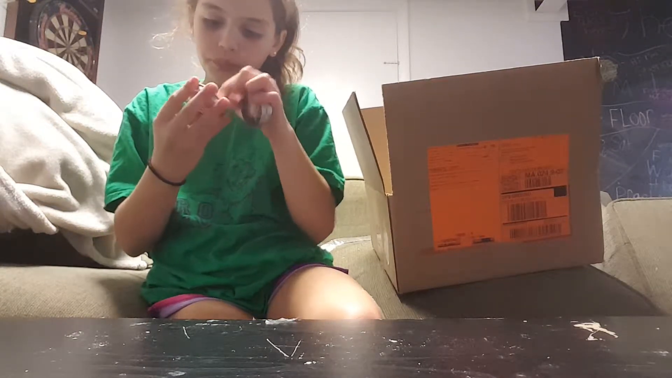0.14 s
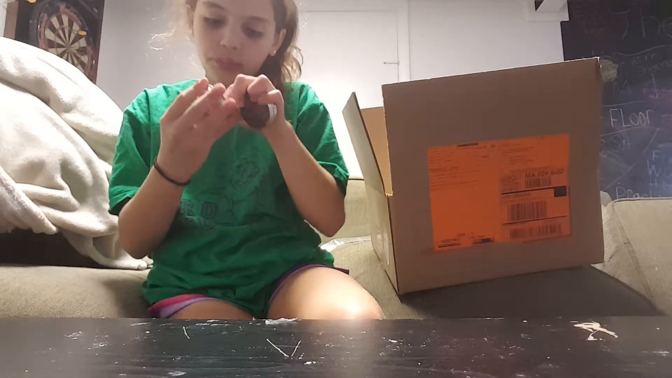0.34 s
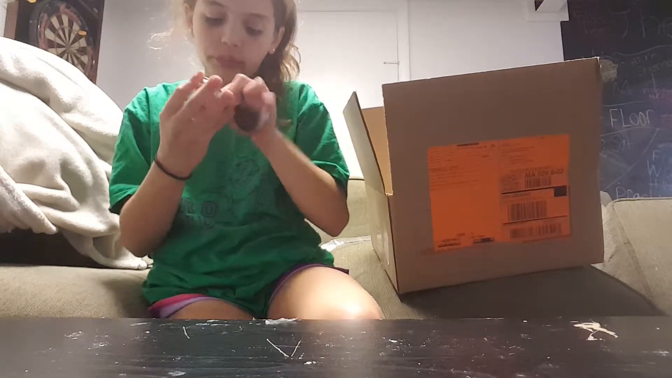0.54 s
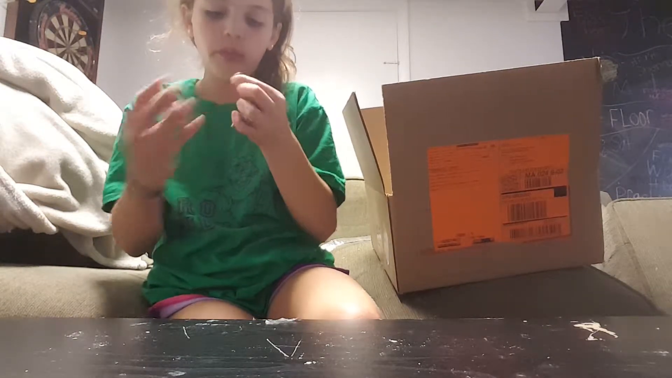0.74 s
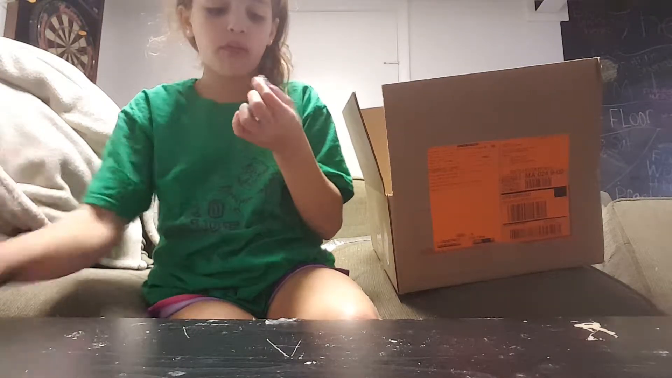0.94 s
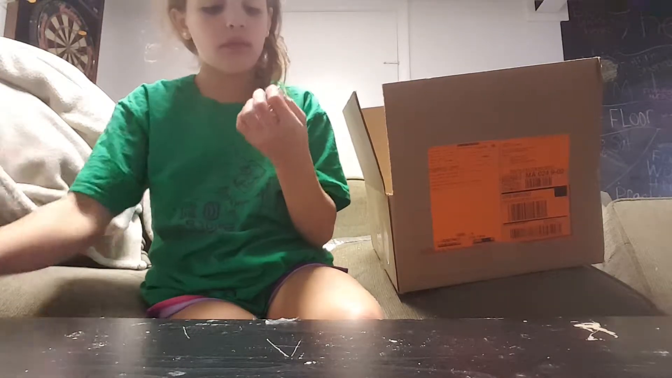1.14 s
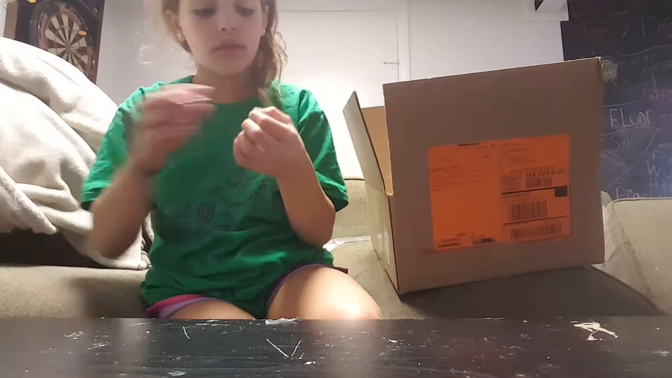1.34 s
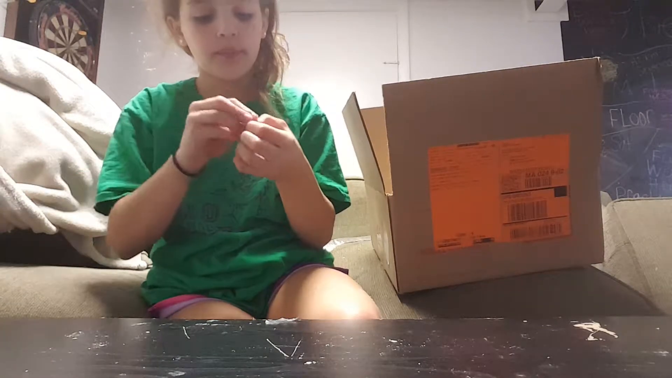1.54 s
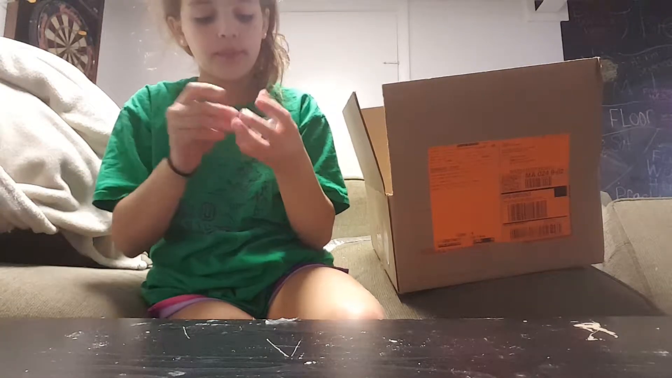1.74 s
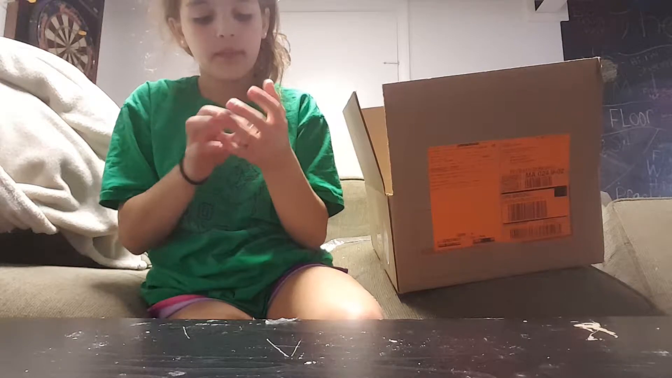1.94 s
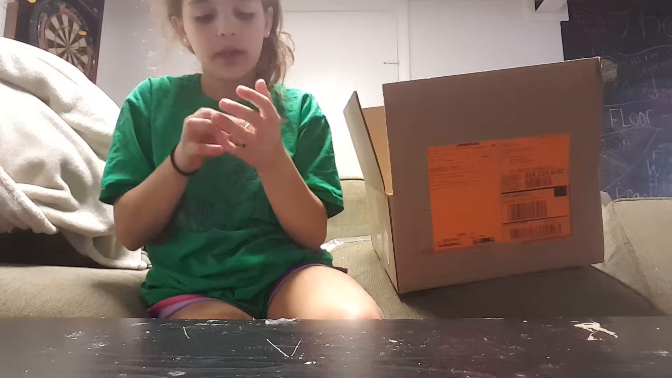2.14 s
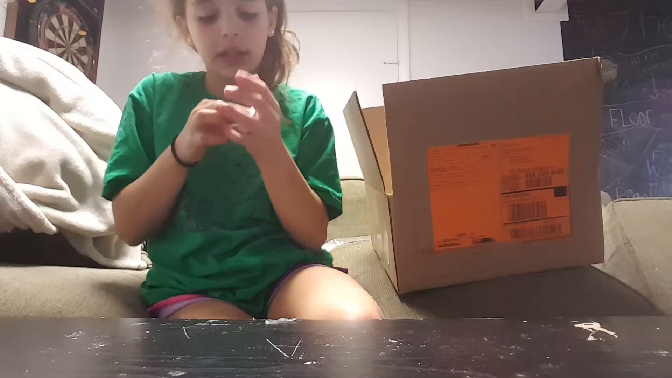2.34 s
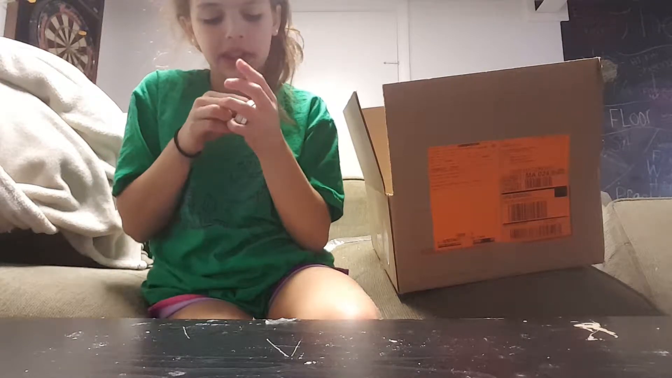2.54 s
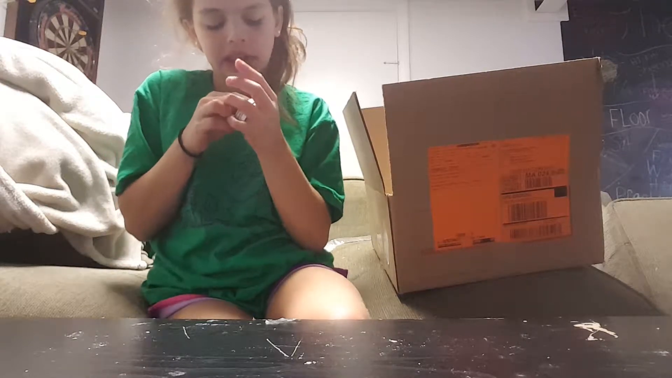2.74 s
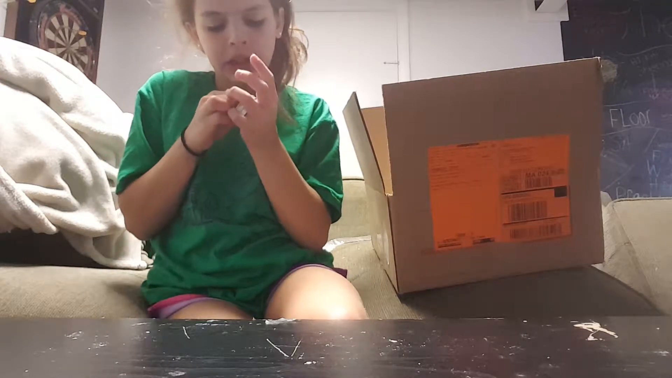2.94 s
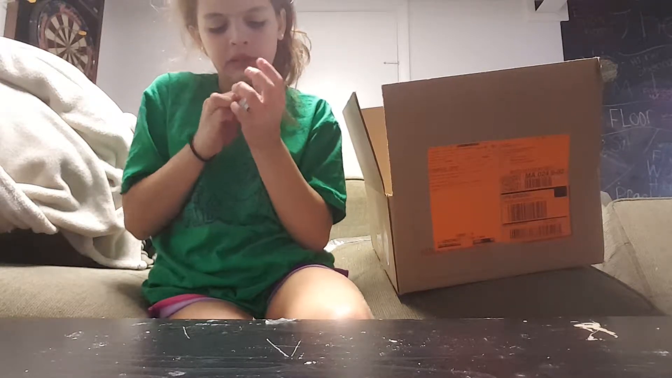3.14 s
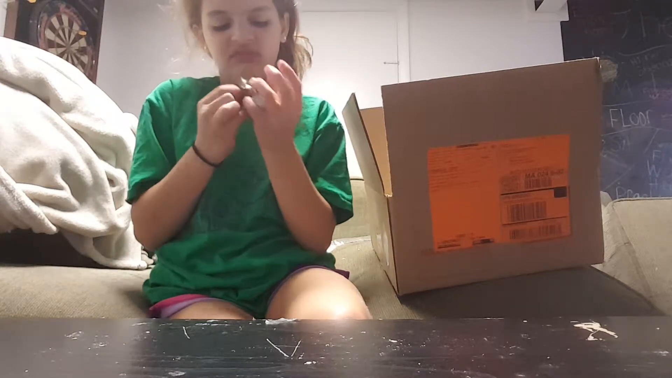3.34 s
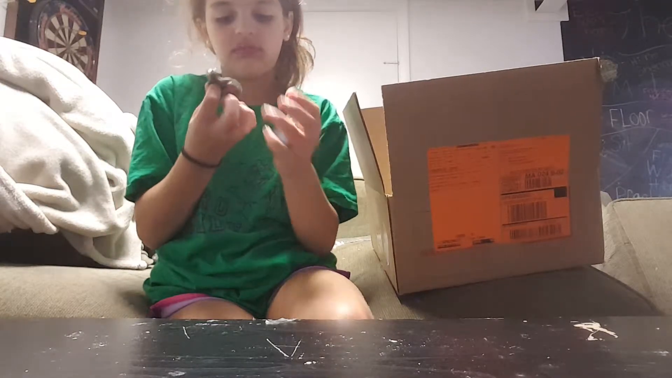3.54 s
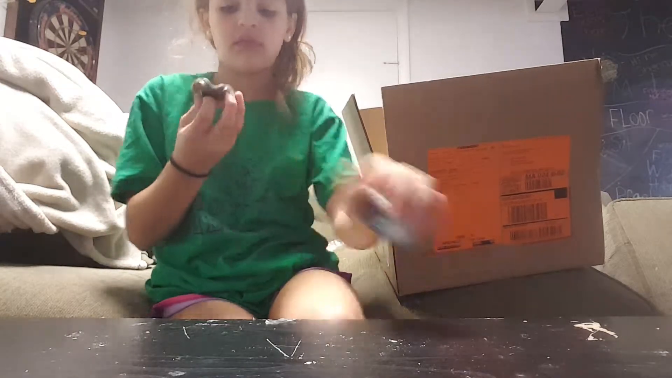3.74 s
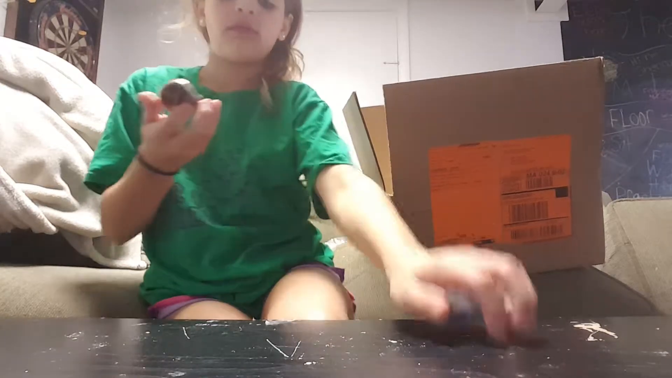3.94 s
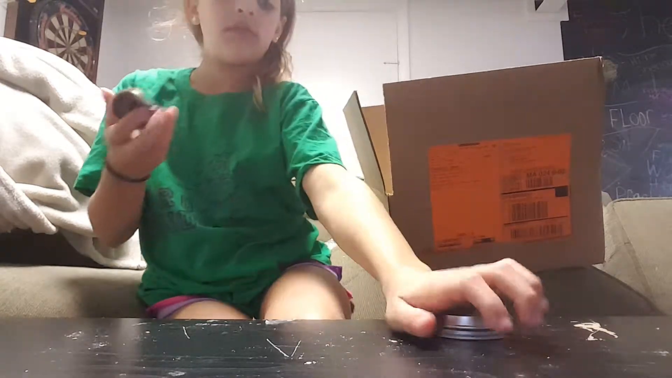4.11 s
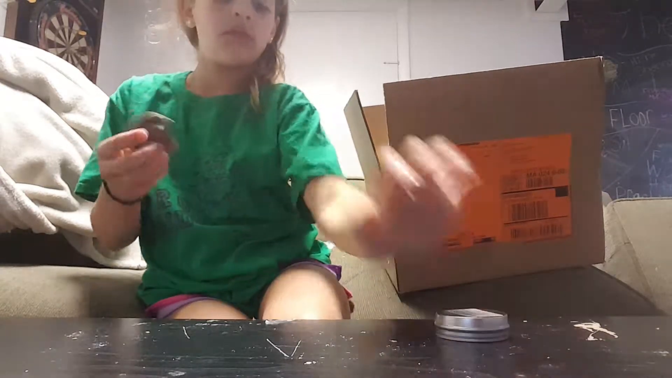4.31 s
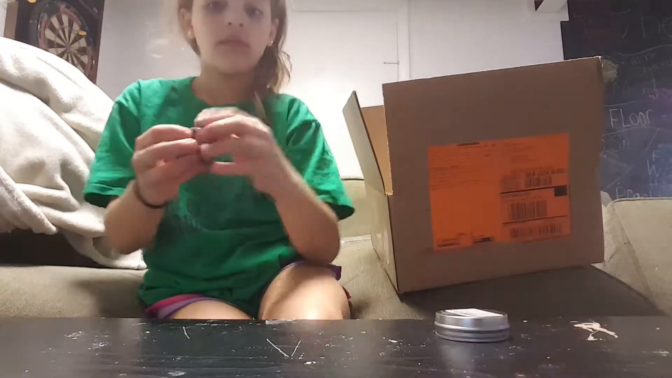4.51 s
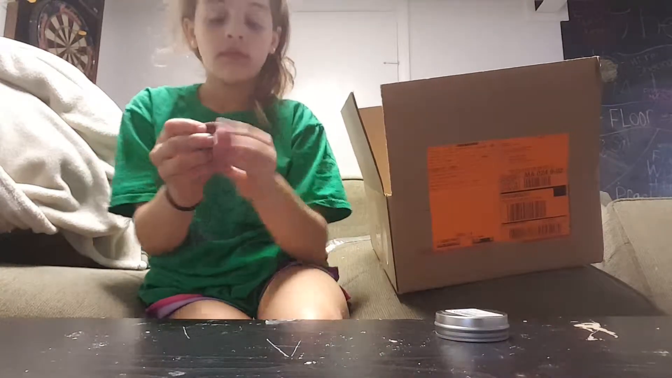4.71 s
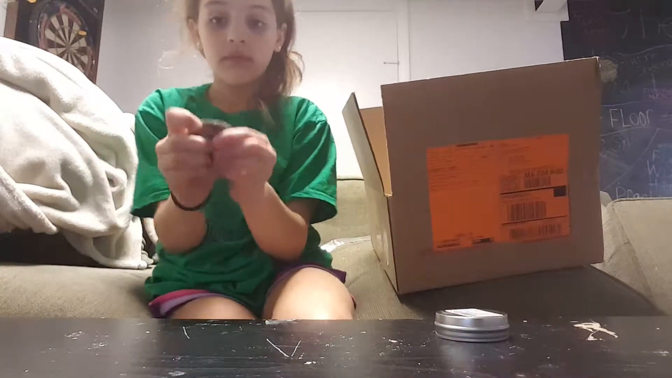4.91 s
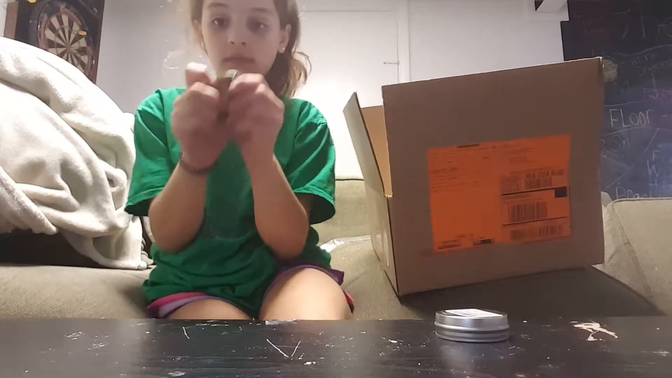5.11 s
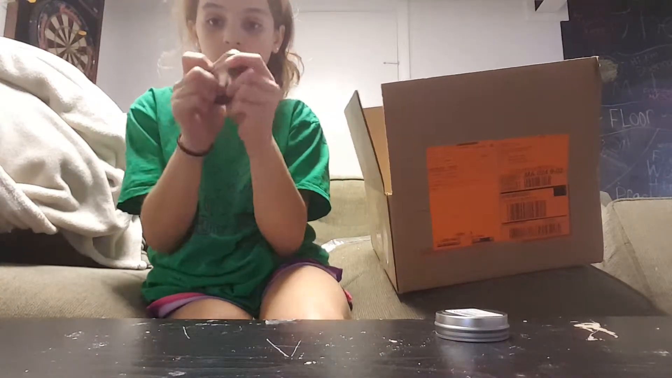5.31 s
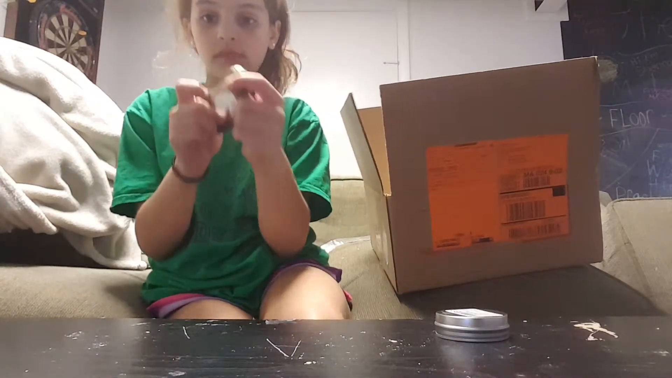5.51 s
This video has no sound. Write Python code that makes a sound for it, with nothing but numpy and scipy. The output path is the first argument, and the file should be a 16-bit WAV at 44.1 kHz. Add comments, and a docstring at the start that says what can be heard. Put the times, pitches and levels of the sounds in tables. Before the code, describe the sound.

Soft sticky handling of putty is interrupted by a loud, close clatter as a small metal lid lands and rolls on a wooden table. Sparse sharp little pops and faint squishes follow from the hands. The tin then knocks onto the table, falls flat and settles with quick fading ticks. A dull bump comes near the end, and the quiet room holds a low rumble and slight electrical hum.

```python
"""A small metal tin of putty, handled over a wooden table in a quiet room.
Its lid drops, bounces and rolls on its rim; later the tin is set down, tips, falls flat and rocks.
Blows clack, ring the metal's modes and make the table top boom. Air pockets pop in the putty, and
fingers tap the tin and drag putty over it. Under this: soft bumps, a low rumble that comes up
and stays, room air and mains hum."""
import sys
import numpy as np
from scipy import signal
from scipy.fft import rfft, irfft
from scipy.io import wavfile
from scipy.ndimage import uniform_filter1d

SR = 44100
rng = np.random.default_rng(int(sys.argv[2]) if len(sys.argv) > 2 else 0)


def dump_mix(stems):
    """Bounce the given channels to the path in sys.argv[1] as a 16-bit WAV at rate SR."""
    frames = np.atleast_2d(stems).T  # one column per channel
    limited = np.clip(frames, -1, 1)  # hard clip at full scale
    pcm = np.round(limited * 32767).astype(np.int16)
    wavfile.write(sys.argv[1], SR, pcm)


N = 250047
T = np.arange(16384) / SR  # time within one event, s

# The lid's blows on the table, and the first blow's two quick echoes. Each row: start in seconds,
# level in dB, treble in dB, bass in dB, clack t60 in seconds, metal ring in dB.
LID_BLOWS_AND_ECHOES = [(1.0347, -3.5, 3, 0, 0.03, 3.5), (1.0399, -7, 0, -12.5, 0.081, 3),
                        (1.0512, -15.5, -4.5, 8.5, 0.074, -5.5), (1.0769, -7.5, 10.5, -11, .038, -6),
                        (1.0832, -11, -16, 2, 0.11, -12.5), (1.1505, -15.5, 0.5, -7, 0.083, -5),
                        (1.2105, -11.5, -2.5, -12.5, 0.052, -9.5), (1.2347, -15, 1, -1, 0.033, -22),
                        (1.2434, -15, -0.5, -4.5, 0.078, -9)]
# The tin's blows on the table; same columns.
TIN_BLOWS = [(4.0196, -16, 0, 7, 0.092, -9), (4.0216, -14.5, 14, -3.5, 0.018, -1),
             (4.0967, -14.5, 14.5, -3.5, 0.033, -27), (4.1005, -15, -8, -6, 0.095, 4),
             (4.2415, -24.5, -25, -4, 0.037, -9), (4.2688, -16.5, -33, -7.5, 0.043, -0.5),
             (4.3094, -9, 0, -9, 0.041, -6.5), (4.3225, -17.5, -19.5, 1, 0.044, -0.5),
             (4.3315, -10.5, -15.5, -15.5, 0.057, -5), (4.3395, -13.5, -11.5, -9, 0.024, -2.5),
             (4.3455, -21.5, -13, -8.5, .06, -3.5)]


def amp(db):
    """Decibels to gain."""
    return 10 ** (np.asarray(db) / 20)


def rms(x):
    """Root mean square, never zero."""
    return np.sqrt(np.mean(x ** 2) + 1e-20)


def unit(x):
    """Scale to rms 1."""
    return x / rms(x)


def read(points, hz):
    """Interpolate a table over log frequency."""
    points_hz, values = np.transpose(points)
    return np.interp(np.log(hz + 1), np.log(points_hz + 1), values)


def add(mix, start_s, sound):
    """Mix a sound in at start_s."""
    part = mix[:, round(start_s * SR):][:, :sound.shape[-1]]
    part += sound[..., :part.shape[1]]


def bins(x):
    """FFT bin frequencies in Hz."""
    return np.fft.rfftfreq(x.shape[-1], 1 / SR)


def shaped(x, gain_db):
    """Minimum-phase filter, one gain per bin."""
    log_gain = np.log(amp(gain_db))
    mirrored = np.concatenate([log_gain, log_gain[-2:0:-1]])
    response = np.exp(np.conj(signal.hilbert(mirrored)))[:len(gain_db)]
    return irfft(rfft(x) * response, x.shape[-1])


def coloured(x, colour):
    """Filter at constant power. Each colour row: frequency in Hz, relative gain in dB."""
    return unit(shaped(x, read(colour, bins(x)))) * rms(x)


def resonant(x, hz, gain_db, width):
    """Lift one resonance at constant power; width is a fraction of hz."""
    peak_db = gain_db / (1 + ((bins(x) / hz - 1) / width) ** 2)
    return unit(shaped(x, peak_db)) * rms(x)


def shelves(x, treble_db, bass_db=0, treble_hz=2100, bass_hz=450):
    """Shelving EQ: hard contacts are brighter, heavy ones have more bass."""
    hz = bins(x)
    high_db = treble_db * (1 - 1 / (1 + (hz / treble_hz) ** 4))
    low_db = bass_db / (1 + (hz / bass_hz) ** 4)
    return shaped(x, high_db + low_db)


def noise(size):
    """Stereo white noise, more alike in the bass."""
    # Each row: frequency in Hz, left-right coherence.
    likeness = [(50, 0.14), (150, 0.53), (400, 0.28), (1000, 0.28), (2000, 0.12), (5000, 0.044),
                (16000, 0.08)]
    left, independent = rfft(rng.standard_normal((2, size)))
    coherence = read(likeness, np.fft.rfftfreq(size, 1 / SR))
    right = coherence * left + np.sqrt(1 - coherence ** 2) * independent
    return irfft(np.array([left, right]), size)


def burst(t60_s, rise_s=0.0004):
    """Decaying noise: dense resonances after one contact."""
    envelope = amp(-60 * T / t60_s) * (1 - np.exp(-T / rise_s))
    return unit(noise(len(T)) * envelope) * rms(envelope)


def stroke(length_s, grain_db, release_t60_s=0.06):
    """A run of tiny uneven contacts that swells, holds and dies away."""
    grains = amp(grain_db * unit(uniform_filter1d(rng.standard_normal(len(T)), size=90)))
    swell = np.sin(np.pi / 2 * np.minimum(4 * T / length_s, 1)) ** 2
    release = amp(-60 * np.maximum(T - 0.75 * length_s, 0) / release_t60_s)
    return unit(noise(len(T)) * grains) * swell * release


def ring(modes, lag_s=0, scatter_hz=2500, rise_cycles=0.95):
    """Damped modes; higher ones reach the two microphones more out of step."""
    hz, db, t60_s = np.transpose(modes)[:, :, None]
    side = np.array([-0.5, 0.5])[:, None, None]
    scatter_rad = rng.standard_normal(hz.shape) * np.minimum(hz / scatter_hz, np.pi / 2)
    phase_rad = side * (2 * np.pi * hz * lag_s + scatter_rad)
    envelope = amp(db - 60 * T / t60_s) * (1 - np.exp(-(T * hz / rise_cycles) ** 2))
    return (envelope * np.sin(2 * np.pi * hz * T + phase_rad)).sum(1)


def excite(drive, modes):
    """Modes kept ringing by a drive, at the drive's power."""
    ringing = signal.fftconvolve(drive, ring(modes), axes=1)[:, :drive.shape[1]]
    return unit(ringing) * rms(drive)


def background(air_db=-69):
    """Room air, microphone hiss and faint mains hum."""
    air_colour = [(20, -6), (60, -1), (110, -1.5), (170, -5.5), (300, -8.5), (600, -9.5), (1200, -14),
                  (2400, -16), (4500, -24.5), (9000, -31), (13000, -27), (16000, -31.5)]
    # Each row: frequency in Hz, rms level in dB.
    hum_tones = [(120, -74), (240, -79), (360, -82), (480, -83), (1201, -88)]
    t = np.arange(N) / SR
    hum = sum(amp(db) * np.sqrt(2) * np.sin(2 * np.pi * (hz * t + rng.random())) for hz, db in hum_tones)
    return amp(air_db) * coloured(noise(N), air_colour) + hum


def rumble(start_s=1.24, rise_s=0.66, quiet_db=-76.5, full_db=-62.5, flutter_db=2):
    """Soft, uneven low rumble that swells once and stays."""
    rumble_colour = [(20, -16.5), (60, -4.5), (150, 1), (300, -9), (500, -14.5), (900, -21.5), (2500, -27),
                     (5000, -36.5), (16000, -41)]
    level_db = np.interp(np.arange(N) / SR, [start_s, start_s + rise_s], [quiet_db, full_db])
    flutter = unit(uniform_filter1d(rng.standard_normal(N), size=2200))
    return coloured(noise(N), rumble_colour) * amp(level_db + flutter_db * flutter)


def bumps(push=16, shudder=0.65):
    """Soft bumps, each a dull push and a short low shudder."""
    # Each row: start in seconds, level in dB, treble in dB, t60 in seconds.
    events = [(0.146, -58.5, -2, 0.055), (3.041, -54, 0.5, 0.024), (3.971, -56, -13, 0.22),
              (4.002, -49, -2.5, 0.063), (5.188, -39, -10, 0.22), (5.2166, -39, -5.5, 0.054)]
    bump_colour = [(20, -7.5), (60, 6), (130, 1.5), (250, -0.5), (500, -3.5), (900, -16), (1300, -18.5),
                   (2000, -31.5), (3700, -27), (6000, -40), (16000, -48)]
    out = np.zeros((2, N))
    for start_s, db, treble_db, t60_s in events:
        bump = coloured(shudder * burst(t60_s) - push * (T == 0), bump_colour)
        add(out, start_s, amp(db) * shelves(bump, treble_db))
    return out


def squishes():
    """Fingers drag sticky putty over the metal."""
    # Each row: start in seconds, length in seconds, level in dB, treble in dB, squeak in Hz.
    drags = [(0.294, 0.02, -55, -19, 1250), (0.593, 0.047, -60.5, -2.5, 1090),
             (0.613, 0.024, -61, 8.5, 1060), (2.226, 0.028, -70, 3, 2860), (2.868, 0.022, -76.5, 12, 2260),
             (3.06, .12, -63.5, -14, 490), (3.157, 0.026, -52, -7.5, 2140), (3.277, 0.073, -53, -10, 2154),
             (3.32, 0.077, -67.5, 11.5, 2000), (3.821, 0.028, -62.5, -6.5, 1110),
             (4.729, 0.33, -72, 2, 2510)]
    squish_colour = [(100, -17.5), (600, -2), (1150, -1), (1600, -4.5), (2200, 4.5), (3300, -11),
                     (6000, -9.5), (11000, -12), (16000, -22.5)]
    out = np.zeros((2, N))
    for start_s, length_s, db, treble_db, squeak_hz in drags:
        drag = coloured(stroke(length_s, grain_db=4.5, release_t60_s=0.035), squish_colour)
        squish = resonant(drag, squeak_hz, gain_db=10.5, width=0.15)
        add(out, start_s, amp(db) * shelves(squish, treble_db))
    return out


def taps():
    """Fingertips briefly ring the held tin."""
    # Each row: start in seconds, level in dB.
    touches = [(.298, -53.5), (.619, -57), (0.9152, -45.5)]
    # Each row: frequency in Hz, level in dB, t60 in seconds.
    held_modes = [(1049, -8, 0.024), (1110, 0.5, 0.058), (2318, -21, 0.04), (4420, -21.5, 0.045),
                  (6200, -25, .035)]
    out = np.zeros((2, N))
    for start_s, db in touches:
        add(out, start_s, amp(db) * ring(held_modes))
    return out


def pops(trim_db=-5):
    """Air pockets burst in the putty, each with its own resonance."""
    # Each row: start in seconds, level before trim in dB, treble in dB, t60 in seconds, resonance in Hz.
    pockets = [(0.5875, -57, 10, 0.011, 10800), (0.652, -43.5, -4, 0.02, 1693),
               (1.6726, -50.5, 3, 0.024, 3000), (2.088, -57.5, 11, 0.01, 11360),
               (2.116, -52.5, 5, 0.014, 13760), (2.204, -52.5, 4.5, .012, 7500),
               (2.232, -40, 2, 0.017, 2780), (2.378, -34.5, -4.5, 0.015, 9300),
               (2.8694, -41.5, -1.5, 0.013, 4000), (3.3204, -36, 2, 0.013, 12230),
               (3.356, -23.5, -2, 0.013, 10040), (3.363, -39, 5, 0.011, 11900),
               (3.463, -57.5, 4.5, 0.011, 14040), (3.828, -55.5, 8.5, 0.0089, 8150),
               (4.7943, -45.5, 7, 0.0088, 12890), (5.032, -56, 1, 0.011, 9070)]
    pop_colour = [(100, -15), (900, -3.5), (2500, 0.5), (4500, -13), (8000, -6.5), (12000, -9.5),
                  (16000, 2.5)]
    out = np.zeros((2, N))
    for start_s, db, treble_db, t60_s, pocket_hz in pockets:
        click = coloured(burst(t60_s, rise_s=0.0003), pop_colour)
        pop = resonant(click, pocket_hz, gain_db=10, width=0.15)
        add(out, start_s, amp(db + trim_db) * shelves(pop, treble_db))
    return out


def clatter(clacks, rolls, clack_colour, modes, lag_s, grain_db, snap):
    """A metal dish hits the table, bounces and rolls on its rim."""
    out = np.zeros((2, N))
    for start_s, db, treble_db, bass_db, t60_s, ring_db in clacks:
        attack = burst(t60_s) + snap * (T == 0)
        clack = coloured(attack, clack_colour) + amp(ring_db) * ring(modes, lag_s)
        add(out, start_s, amp(db) * shelves(clack, treble_db, bass_db))
    for start_s, length_s, db, treble_db, bass_db, ring_db, slope_db_per_s in rolls:
        contacts = stroke(length_s, grain_db) * amp(slope_db_per_s * T)
        roll = coloured(contacts, clack_colour) + amp(ring_db) * excite(contacts, modes)
        add(out, start_s, amp(db) * shelves(roll, treble_db, bass_db))
    return out


def lid():
    """The dropped lid clatters to rest on the wood."""
    # Each row: start and length in seconds; level, treble, bass and metal ring in dB; slope in dB/s.
    rolls = [(1.085, 0.081, -30, 8.5, 4.5, -8.5, -190), (1.132, 0.12, -25, -17, -6.5, -2.5, -7),
             (1.24, .042, -14, -17, -22, -10, -220)]
    # Each row: frequency in Hz, level in dB, t60 in seconds.
    modes = [(212.4, -23, 0.26), (413, -19, 0.17), (750.5, -8, .11), (1161.5, 0.5, 0.049),
             (1196, -9, 0.087), (1407, -6, 0.023), (2010, -10, 0.095), (2171, -11, 0.065), (2296, -6.5, .1),
             (2587, -16, .04), (2815, -14, 0.026), (3045, -8.5, 0.078), (4842, -21.5, 0.019),
             (6290, -29, 0.035)]
    clack_colour = [(30, -21.5), (90, -13), (300, -6.5), (450, 2), (600, -5), (1150, -1.5), (1750, -2),
                    (2550, 1), (3050, 1.5), (3700, -8), (5000, -11), (6500, -24), (8500, -28.5),
                    (11000, -41.5), (16000, -46.5)]
    return clatter(LID_BLOWS_AND_ECHOES, rolls, clack_colour, modes, lag_s=70e-6, grain_db=5.5, snap=1)


def table_boom(clacks, relative_db, t60_s):
    """The whole table top booms under each clack."""
    boom_colour = [(20, -13), (45, -2), (95, 2), (150, -7.5), (260, -14.5), (500, -28.5), (1500, -62.5),
                   (16000, -92)]
    out = np.zeros((2, N))
    for start_s, db, *_ in clacks:
        add(out, start_s, amp(db + relative_db) * coloured(burst(t60_s, rise_s=0.0017), boom_colour))
    return out


def lid_sing(start_s=1.148, length_s=0.12, release_s=0.015, start_db=-42.5, swell_db_per_s=14):
    """The lid's thin wall sings as it rolls, swelling slightly."""
    # Each row: frequency in Hz, level in dB, t60 in seconds.
    rim_modes = [(1170, -4, .12), (2296, 3, .2), (3800, 2, .13), (4300, -8, .24), (6900, 4, .1),
                 (9750, -10, .085), (12380, -14, .085), (15120, -23, .07)]
    release = np.clip(1 - (T - length_s) / release_s, 0, 1)
    drive = noise(len(T)) * amp(start_db + swell_db_per_s * T) * release ** 2
    out = np.zeros((2, N))
    add(out, start_s, excite(drive, rim_modes))
    return out


def tin():
    """The tin is set down under a hand, tips, drops flat and rocks."""
    # Each row: start and length in seconds; level, treble, bass and metal ring in dB; slope in dB/s.
    rolls = [(4.07, 0.028, -45.5, 15.5, 6.5, 3.5, 56), (4.098, 0.087, -23, 1.5, 4.5, 3, -200),
             (4.195, 0.14, -35, -18.5, -4.5, -7, 64.5), (4.309, 0.051, -31, -4, -16.5, -1, -180)]
    # Each row: frequency in Hz, level in dB, t60 in seconds.
    modes = [(214.9, -24, 0.3), (434.9, -12, 0.12), (449.8, -19, 0.082), (858, -10, 0.084),
             (887, -8.5, 0.083), (958, -7, 0.071), (1064, -16.5, 0.056), (1196, 6, 0.0264),
             (1205, -8.5, 0.039), (1250, -1.5, 0.11), (1334, -19, 0.16), (1588, -23, 0.031),
             (1910, -19, 0.084), (2307.4, -32, 0.43), (3090, -11, .04), (4120, -30.5, 0.17),
             (8580, -31.5, 0.036), (10880, -44, 0.0351), (13120, -34.5, 0.04), (13650, -46, 0.0402)]
    clack_colour = [(30, -22.5), (100, -3.5), (300, -2.5), (440, 7), (700, -1), (1000, 6.5), (1650, 4.5),
                    (2500, 2.5), (3100, 1.5), (4400, -8), (5500, -22.5), (7000, -38), (10000, -46.5),
                    (13500, -51), (16000, -48)]
    landing = clatter(TIN_BLOWS, rolls, clack_colour, modes, lag_s=-81e-6, grain_db=4, snap=6.94)
    return landing + rocking(clack_colour)


def rocking(clack_colour, start_s=4.405, gap_s=0.048, gap_ratio=0.9, start_db=-47, slope_db_per_s=-57):
    """The tin settles on its base: dull ticks, each sooner and softer."""
    out = np.zeros((2, N))
    tick_s = start_s
    for k in range(6):
        clack = coloured(burst(t60_s=0.11), clack_colour)
        tick = resonant(clack, hz=506, gain_db=17.5, width=0.295)
        level_db = start_db + slope_db_per_s * (tick_s - start_s)
        add(out, tick_s, amp(level_db) * shelves(tick, treble_db=-8))
        tick_s += gap_s * gap_ratio ** k
    return out


def room(x, onset_s=0.0059):
    """Short diffuse tail of a furnished room."""
    # Each row: frequency in Hz, t60 in seconds.
    decay_times = [(100, 0.28), (480, 0.58), (1200, 0.22), (2500, 0.29), (5000, 0.14), (14000, 0.3)]
    hz, frame_s, spectra = signal.stft(noise(SR), SR, nperseg=256)
    decay = amp(-60 * frame_s / read(decay_times, hz)[:, None])
    _, tail = signal.istft(spectra * decay, SR, nperseg=256)
    t = np.arange(tail.shape[1]) / SR
    tail *= 1 - np.exp(-(t / onset_s) ** 2)
    return signal.fftconvolve(x, tail / np.linalg.norm(tail[0]), axes=1)[:, :N]


def out_of_step(x, left_hz=3900, right_hz=1750, width_hz=700):
    """All-passes: direct sound from the table reaches the microphones in antiphase in two bands."""
    radius = np.exp(-np.pi * width_hz / SR)
    denominators = [[1, -2 * radius * np.cos(2 * np.pi * hz / SR), radius ** 2]
                    for hz in (left_hz, right_hz)]
    return np.array([signal.lfilter(a[::-1], a, channel) for a, channel in zip(denominators, x)])


def microphones(x, low_cut_hz=42):
    """Two microphones of slightly different colour, with a low cut."""
    # Each row: frequency in Hz, left minus right in dB.
    imbalance = [(30, 2.5), (130, 0), (300, 0), (800, 0), (1200, 1), (2400, 0.5), (3200, 1.5), (4300, -3.5),
                 (6500, -0.5), (9000, 2), (14000, 3)]
    hz = bins(x)
    cut_db = -10 * np.log10(1 + (low_cut_hz / (hz + 1)) ** 4)
    side_db = np.array([[0.5], [-0.5]]) * read(imbalance, hz)
    return irfft(rfft(shaped(x, cut_db)) * amp(side_db), x.shape[-1])


def scene():
    """Near sounds on the table; farther, wetter sounds in the hands."""
    dropped = lid() + lid_sing()
    placed = tin()
    hands = pops() + squishes() + taps()
    boom = table_boom(LID_BLOWS_AND_ECHOES, relative_db=-31.5, t60_s=0.23)
    boom += table_boom(TIN_BLOWS, relative_db=-29.5, t60_s=0.069)
    send = amp(-28.5) * dropped + amp(-26) * placed + amp(-14) * hands
    wet = room(shelves(send, treble_db=1.5, bass_db=-1, treble_hz=3000, bass_hz=650))
    return out_of_step(placed + dropped) + boom + bumps() + hands + wet + rumble() + background()


def record(dry, threshold_db=-18, duck_db_per_db=0.45, recovery_db_per_s=9, edge_hz=15950):
    """Microphones, gain control that ducks at loud blows and recovers slowly, clipping, band limit."""
    padded = np.pad(dry, ((0, 0), (0, 2 ** 18 - N)))
    heard = microphones(padded)[:, :N]
    power = uniform_filter1d((heard ** 2).mean(0), size=440)
    power_db = 10 * np.log10(abs(power) + 1e-12)
    fall_db = recovery_db_per_s * np.arange(N) / SR
    held_peak_db = np.maximum.accumulate(power_db + fall_db) - fall_db
    over_db = np.maximum(held_peak_db - threshold_db, 0)
    duck_db = duck_db_per_db * uniform_filter1d(over_db, size=100)
    ducked = np.clip(heard / amp(duck_db), -1, 1)
    low_pass = signal.firwin(511, edge_hz, window=("kaiser", 9), fs=SR)
    return signal.oaconvolve(ducked, low_pass[None], "same")


dry = scene()
out = record(dry)
dump_mix(out)
```